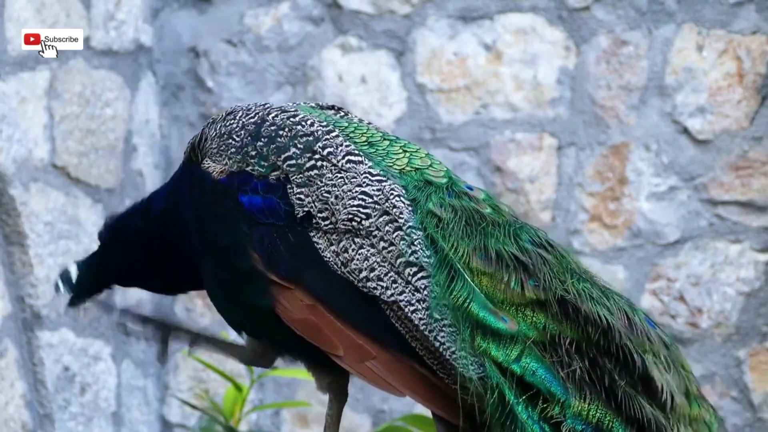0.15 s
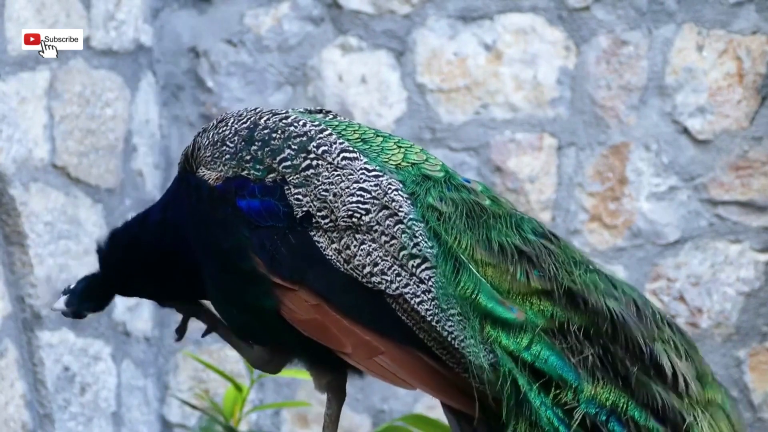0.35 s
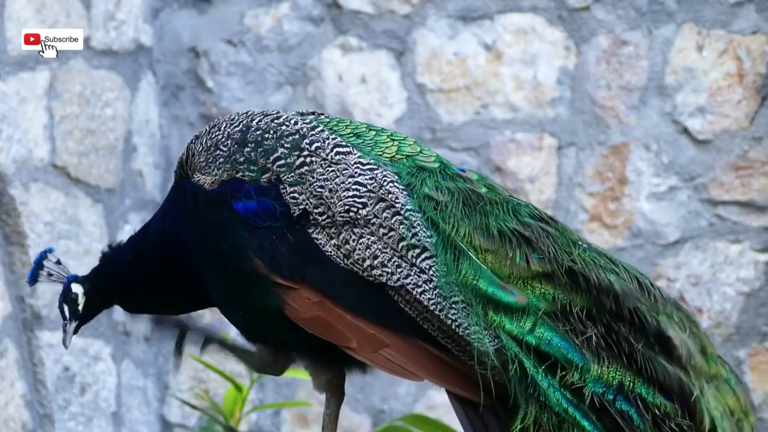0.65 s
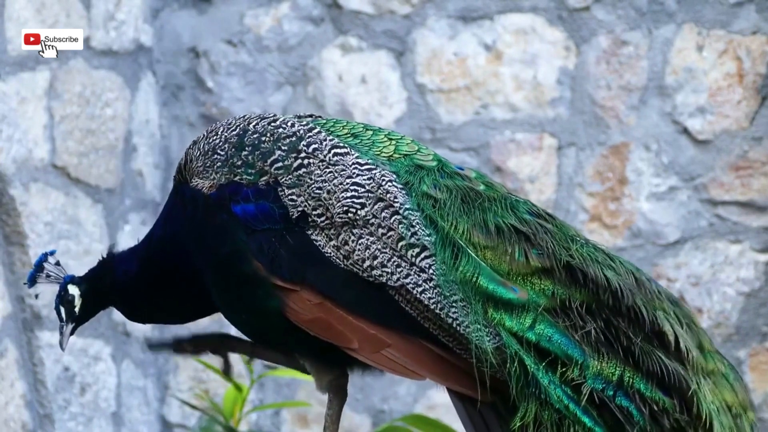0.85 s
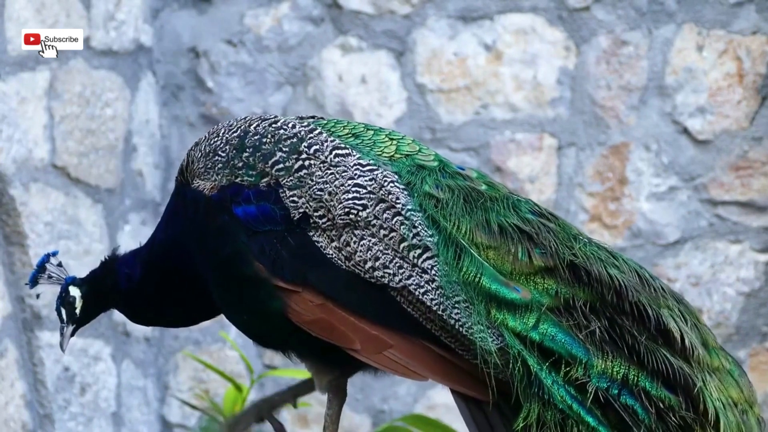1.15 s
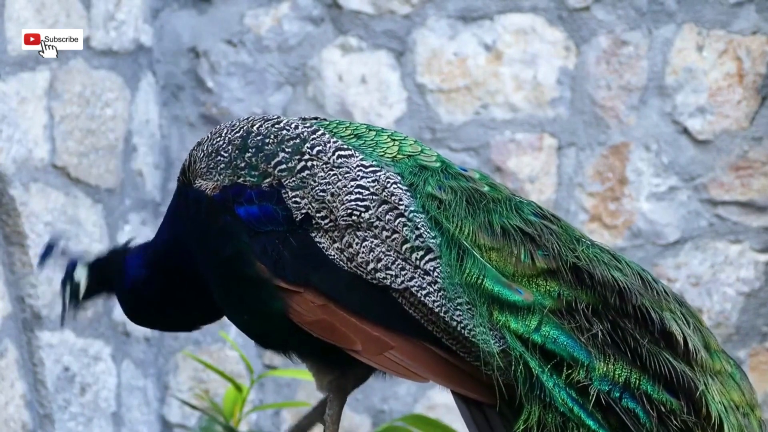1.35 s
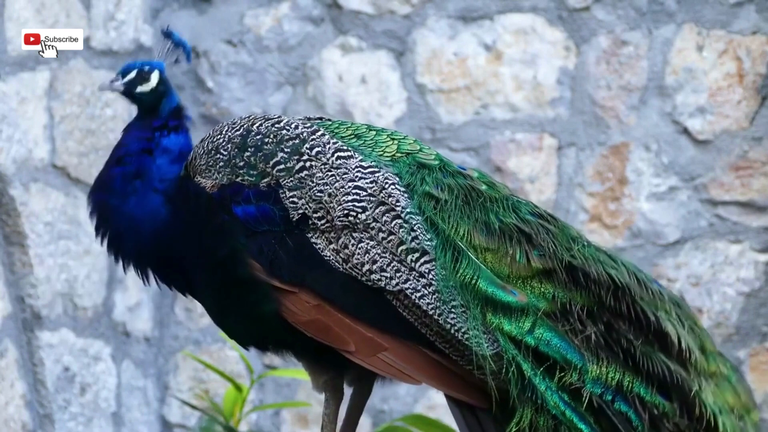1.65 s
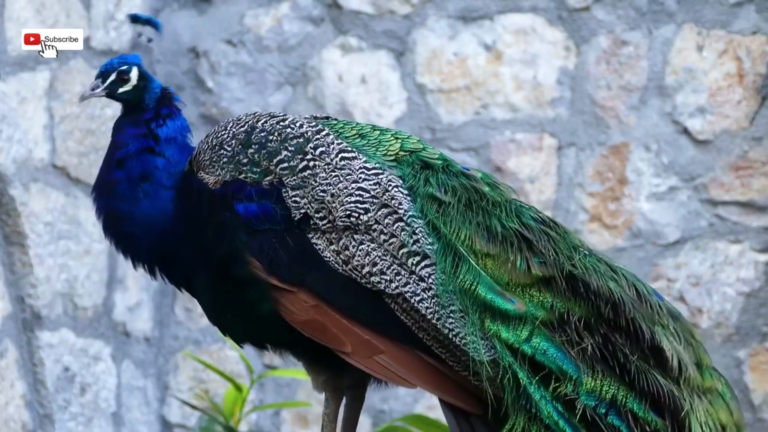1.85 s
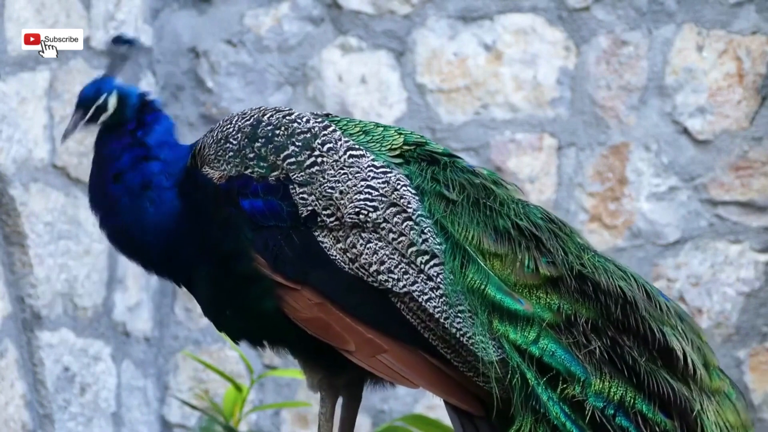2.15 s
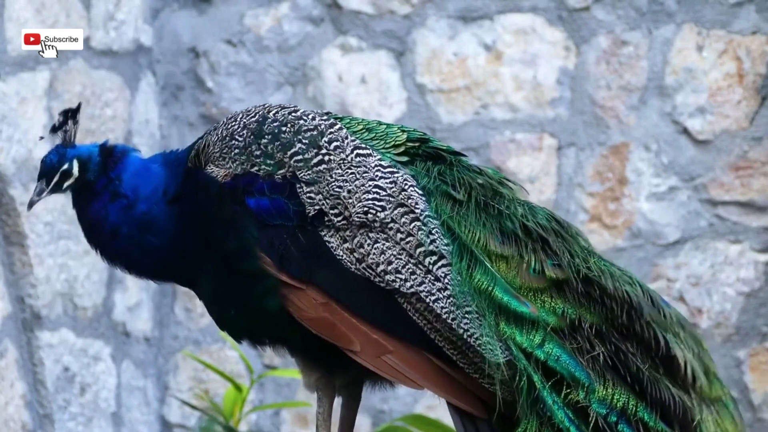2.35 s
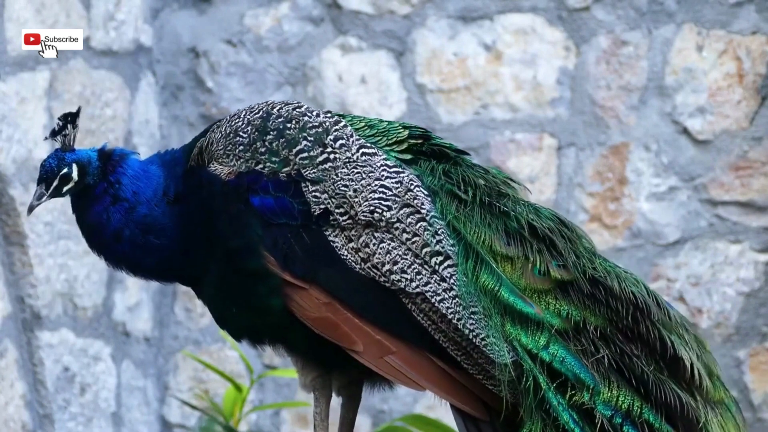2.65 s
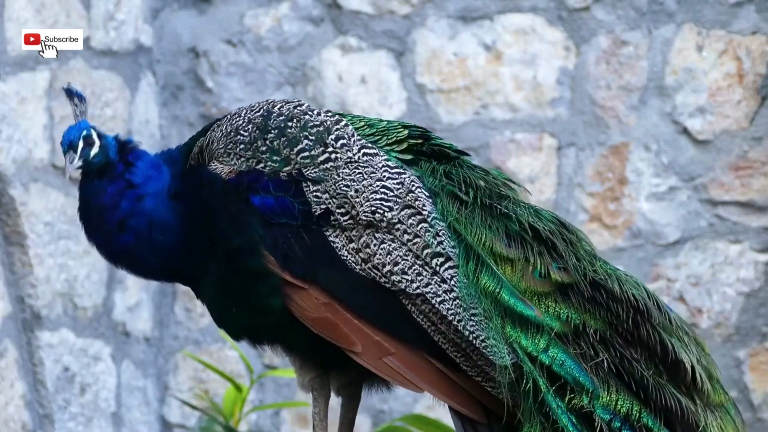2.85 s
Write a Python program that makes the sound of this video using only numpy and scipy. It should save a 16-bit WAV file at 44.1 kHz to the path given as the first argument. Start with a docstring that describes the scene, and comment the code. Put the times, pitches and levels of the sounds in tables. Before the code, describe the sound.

Two piercing nasal peacock wails, each arching up and down, over faint birds and outdoor rumble

```python
"""A peacock gives two loud, arching cries beside a stone wall, which throws them back.
Each cry is a stack of gliding harmonics coloured by throat resonances, with rasp and rushing air.
A brief shrill cluster of narrow noises opens the scene; small birds whistle far off as short swept sines.
Shaped noise makes the low outdoor rumble, the faint hiss and a wavering hum.
The recorder's gain control ducks the background under each cry."""
import sys
import numpy as np
from scipy import signal
from scipy.fft import rfft, irfft, next_fast_len
from scipy.io import wavfile
from scipy.ndimage import uniform_filter1d

SR = 44100
rng = np.random.default_rng(int(sys.argv[2]) if len(sys.argv) > 2 else 0)


def master(y):
    """Save y as 16-bit WAV."""
    cut = np.clip(np.atleast_2d(y).T, -1, 1)
    pcm = np.round(cut * 32767)  # scale
    wavfile.write(sys.argv[1], SR, pcm.astype(np.int16))


N = 132300
TIME = np.arange(N) / SR

# Background
AIR_DB, PATCH_DB, SWELL_DB = -30, 1.5, 0.5
HISS_HZ = 6530  # the hiss above here swells between the cries
HUM_HZ, HUM_WIDTH_HZ = 167.8, 4.1
SHRILL_END_S, SHRILL_FADE_DB_PER_S, SHRILL_DB = 0.049, 109, 0.5

# Peacock voice
VOICE_DB, ATTACK_S, RELEASE_S = 0.5, 0.013, 0.0056
JITTER, JITTER_HZ, SHIMMER_DB = 0.0012, 90, 1  # pitch wobble (fraction), its rate, level wobble
CLEAN_HZ, STRAIN_HZ = 802, 111  # the voice grows rougher as its pitch falls below CLEAN_HZ
RASP_DB, RASP_HZ = -41, 380
RASP_GROWTH = 0.64  # rasp grows with this power of the harmonic's number
SOFT_DB, DULLING, DULL_ABOVE_HZ = -3, 0.67, 5100  # below this effort the treble drops by DULLING dB per dB
RUSH_DB, RUSH_SPREAD_HZ = -35, 230  # the rush of air clings to each harmonic
GLIDE_HZ_PER_S, GLIDE_POWER = 650, 0.85  # the rush grows with the speed of the pitch slide

# Wall, yard and far birds
SCATTER_DB, SCATTER_S = -7, 0.052  # level ahead of the high-pass, length
SCATTER_ABOVE_HZ = 1670  # rough stone scatters the treble and little of the bass
YARD_DB, YARD_DELAY_S = -20, 0.0094  # send level, time for the tail to build up
BLUR_RAD, BLUR_HZ = 0.86, 66  # phase wander of the tail, its rate
CHIRP_WAVER, CHIRP_WET_DB = 0.012, 2.5  # pitch waver (fraction), send into the yard

# Recorder
THRESHOLD_DB, RATIO = -19, 2.25
RECOVER_DB_PER_S = 165  # fall of the held level that steers the gain
LOW_CUT_HZ, EDGE_HZ = 32, 15500


def amp(db):
    """Decibels to gain."""
    return 10 ** (np.asarray(db) / 20)


def unit(x):
    """Scales to rms 1."""
    return x / np.sqrt(np.mean(abs(x) ** 2) + 1e-20)


def read(points, hz):
    """Reads a curve of values over frequency on a log-frequency axis."""
    f, value = np.transpose(points)
    return np.interp(np.log(hz + 1), np.log(f + 1), value)


def add(mix, s, sound):
    """Adds a sound to the mix at time s in seconds."""
    part = mix[max(round(s * SR), 0):][:len(sound)]
    part += sound[:len(part)]


def wander(rate_hz):
    """Random motion of rms 1: noise that falls off steeply above the given rate."""
    hz = np.fft.rfftfreq(N, 1 / SR)
    return unit(irfft(rfft(rng.standard_normal(N)) / (1 + (hz / rate_hz) ** 4), N))


def flutter(rate_hz):
    """Random wobble of both size and phase."""
    return (wander(rate_hz) + 1j * wander(rate_hz)) / 2


def fuzzy_tone(hz, width_hz):
    """Noise in one narrow band around a pitch, at rms 1."""
    carrier = np.exp(2j * np.pi * hz * TIME)
    return unit((flutter(width_hz / 2) * carrier).real)


def air():
    """Outdoor rumble and hiss: noise shaped in frequency with drifting patches, and a wavering low hum."""
    # Spectrum of the air before scaling. Each row: frequency in Hz, relative density in dB per Hz.
    air_spectrum = [(20, -28.5), (32, -11), (48, -10), (85, -4), (125, -10.5), (166, -2.5), (230, -6.5),
                    (330, -9), (500, -14.5), (1100, -20), (1600, -23), (2400, -23.5), (3600, -27.5),
                    (5000, -36), (6300, -46.5), (8100, -56.5), (9500, -66), (15000, -74.5)]
    # Swell of the top of the hiss. Each row: time in seconds, level in dB.
    hiss_level = [(0, -6), (.6, -26), (.95, -11), (1.3, 4), (1.8, 7), (2.1, -2), (2.6, -9.5), (3, -8.5)]
    # Loudness of the hum. Each row: time in seconds, level in dB.
    hum_level = [(0, -43), (1.0, -40), (1.6, -39), (2.05, -34), (2.4, -38), (3, -40)]
    frames, hz = N // 512 + 5, np.fft.rfftfreq(2048, 1 / SR)
    t = np.arange(frames) * 512 / SR
    real, imag, patches = rng.standard_normal((frames, len(hz), 3)).T
    patches = uniform_filter1d(patches, size=16, axis=0)
    patches = unit(uniform_filter1d(patches, size=7, axis=1))
    z = (real + 1j * imag) * amp(read(air_spectrum, hz)[:, None] + PATCH_DB * patches)
    top = 1 - 1 / (1 + (hz[:, None] / HISS_HZ) ** 8)
    z *= amp(top * np.interp(t, *np.transpose(hiss_level)))
    wash = unit(signal.istft(z, nperseg=2048, noverlap=1536)[1][:N])
    swell = amp(AIR_DB + SWELL_DB * wander(rate_hz=2))
    hum = amp(np.interp(TIME, *np.transpose(hum_level))) * fuzzy_tone(HUM_HZ, HUM_WIDTH_HZ)
    return swell * wash + hum


def shrill():
    """A cluster of high partials and a band of noise holds briefly and fades."""
    # Partials and noise band. Each row: frequency in Hz, width in Hz, level in dB before the common trim.
    partials = [(2430, 30, -40), (2630, 120, -39.5), (2850, 150, -38), (3150, 780, -35.5), (3225, 47, -32),
                (3610, 36, -33.5)]
    level = SHRILL_DB - SHRILL_FADE_DB_PER_S * np.maximum(TIME - SHRILL_END_S, 0)
    return amp(level) * sum(amp(db) * fuzzy_tone(hz, width) for hz, width, db in partials)


def cry(table, throat):
    """Harmonics of the syrinx sweep through the throat's resonances, with rasp at low pitch and air on slides."""
    # Rush of air through the strained syrinx. Each row: frequency in Hz, relative density in dB per Hz.
    rush_spectrum = [(1000, -23), (2500, -7.5), (4000, 3.5), (6000, -0.5), (7300, -20), (8600, -23),
                     (10500, -16), (11700, -26.5), (13200, -29.5), (15000, -36.5)]
    s, pitch, effort, second, third = np.transpose(table)
    t = np.arange(s[0], s[-1] + RELEASE_S, 1 / SR)
    n = len(t)
    hz = uniform_filter1d(np.interp(t, s, pitch), size=500)
    effort_db = np.interp(t, s, effort)
    strain = 1 + np.clip((CLEAN_HZ - hz) / STRAIN_HZ, 0, 2)
    jittered_hz = hz * (1 + JITTER * strain * wander(JITTER_HZ)[:n])
    phase = 2 * np.pi * np.cumsum(jittered_hz) / SR
    lift = {2: np.interp(t, s, second), 3: np.interp(t, s, third)}
    dull_db = DULLING * np.minimum(effort_db - SOFT_DB, 0)
    slide_hz_per_s = abs(np.gradient(uniform_filter1d(hz, size=2600))) * SR
    glide = (slide_hz_per_s / GLIDE_HZ_PER_S) ** GLIDE_POWER
    voice = np.zeros(n)
    for k in range(1, 21):
        rasp = amp(RASP_DB) * strain * k ** RASP_GROWTH * flutter(RASP_HZ)[:n]
        tone = amp(read(throat, k * hz) + lift.get(k, 0)) * (1 + rasp)
        rush = amp(RUSH_DB + read(rush_spectrum, k * hz)) * glide * flutter(RUSH_SPREAD_HZ)[:n]
        dull = amp(dull_db / (1 + (DULL_ABOVE_HZ / (k * hz)) ** 10))
        carrier = np.exp(1j * (k * phase + 2 * np.pi * rng.random()))
        voice += dull * ((tone + rush) * carrier).real
    fade_in = np.clip((t - t[0]) / ATTACK_S, 0, 1)
    fade_out = np.clip((t[-1] - t) / RELEASE_S, 0, 1)
    level = VOICE_DB + effort_db + SHIMMER_DB * strain * wander(JITTER_HZ)[:n]
    return s[0], np.sqrt(2) * fade_in * fade_out * amp(level) * voice


def walls(x):
    """Direct sound, a few distinct echoes and the scatter of rough stone."""
    # Reflections from the ground and the walls. Each row: delay in seconds, level in dB.
    echoes = [(.007, -18.5), (.024, -24.5), (.038, -16.5), (.046, -18)]
    t = np.arange(SR // 8) / SR
    taps = rng.standard_normal(len(t)) * np.minimum(t / 0.0014, 1) / (1 + (t / SCATTER_S) ** 6)
    taps *= amp(SCATTER_DB) / np.linalg.norm(taps)
    taps = signal.sosfilt(signal.butter(2, SCATTER_ABOVE_HZ, "high", fs=SR, output="sos"), taps)
    taps[0] += 1  # direct sound
    for delay, db in echoes:
        add(taps, delay, amp([db]))
    return signal.fftconvolve(x, taps)[:N]


def yard(x):
    """The long diffuse tail of the yard: each band dies at its own speed, and held tones smear."""
    # Decay of the tail. Each row: frequency in Hz, time in seconds to fall by 60 dB.
    decay = [(500, 1.4), (2500, 1.32), (4500, 1.44), (7000, 0.28), (14000, 0.84)]
    hz, t, z = signal.stft(rng.standard_normal(SR * 3 // 2), SR, nperseg=256)
    tail = signal.istft(z * amp(-60 * t / read(decay, hz)[:, None]), SR, nperseg=256)[1]
    tail *= np.minimum(np.arange(len(tail)) / SR / YARD_DELAY_S, 1)
    wet = signal.fftconvolve(x, tail / np.linalg.norm(tail) / np.sqrt(2))
    analytic = signal.hilbert(wet, next_fast_len(len(wet)))[:N]
    return (analytic * np.exp(1j * BLUR_RAD * wander(BLUR_HZ))).real


def small_birds():
    """Short wavering whistles, each a sine sliding between two pitches, blurred by distance."""
    # Far small birds. Each row: start in seconds, length in seconds, start pitch in Hz, end pitch in Hz,
    # peak level of the direct whistle in dB.
    chirps = [(1.06, 0.021, 6000, 5800, -51), (1.079, 0.11, 3800, 3715, -40), (1.18, .05, 4400, 4193, -49),
              (1.371, 0.045, 4300, 3750, -39), (1.41, 0.042, 3520, 3535, -38),
              (1.475, 0.047, 3500, 3540, -37.5), (1.554, .05, 3400, 3290, -43),
              (1.601, 0.089, 3150, 3050, -44), (1.965, 0.03, 3600, 4200, -43),
              (2.015, 0.014, 2800, 2490, -33)]
    out = np.zeros(N)
    for start, length, from_hz, to_hz, db in chirps:
        n = int(length * SR)
        hz = np.linspace(from_hz, to_hz, n) * (1 + CHIRP_WAVER * wander(rate_hz=330)[:n])
        whistle = np.sin(2 * np.pi * np.cumsum(hz) / SR)
        add(out, start, amp(db) * np.sqrt(np.hanning(n)) * whistle)
    return out + amp(CHIRP_WET_DB) * yard(out)


def scene():
    """The peacock in its yard, with the background."""
    # Course of each cry. Each row: time in seconds, pitch in Hz, effort in dB, lift of the 2nd harmonic in dB,
    # lift of the 3rd harmonic in dB.
    first_cry = [(0.186, 635, -16.5, 4.5, 10), (0.21, 670, -19.5, 10.5, 7.5), (0.25, 706, -7, 2, 8),
                 (0.29, 740.0, -7, -2.5, -5.5), (0.33, 781.3, -6, -1, 8), (0.38, 812.3, 0.5, -16.5, 2.5),
                 (0.45, 819.9, 0, -12.5, -2), (0.52, 822.5, -1, -5.5, 7.5), (0.59, 815.6, -1.5, -8.5, -0.5),
                 (0.65, 787, -3.0, -8, 5.5), (0.71, 753.5, -4, 2.5, -0.5), (0.76, 722.7, -11.5, -1.5, 11.5),
                 (0.8, 678, -11.0, 3.5, 5), (0.822, 599.7, -19.5, -0.5, -7)]
    second_cry = [(2.058, 647, -17.5, -3, -5), (2.09, 672.4, -17.5, 3.5, -1.5),
                  (2.145, 676.0, -13, -1, -11), (2.165, 703, -11, 1, 11), (2.195, 788, -12, 11, -4),
                  (2.23, 858.7, -5.5, -3, -19.5), (2.29, 889.7, 3.5, 0.5, -21),
                  (2.35, 897.9, 4, -6.5, -20.5), (2.4, 897.4, 6, -9.0, -15), (2.44, 882, 1, -6, -0.5),
                  (2.51, 845, -0.5, -7.5, -1.5), (2.58, 794.7, -0.5, -3.5, -5.5),
                  (2.64, 741.6, -6.5, 2, 4.5), (2.695, 690.4, -9, -3.5, 1), (2.725, 649, -17, -6, -17)]
    # Colour of throat and beak in each cry. Each row: frequency in Hz, relative level in dB.
    first_throat = [(620, -22.5), (760, -17.5), (900, -11.5), (1400, -7.5), (2100, -10), (2500, 0),
                    (2850, -6.5), (3120, -8), (3310, -27), (3530, -0.5), (3850, -14.5), (4100, -7.5),
                    (4500, -17.5), (5350, -21), (6400, -27.5), (7200, -51.5), (8200, -48.5), (10600, -51),
                    (12000, -70.5), (15000, -62.5)]
    second_throat = [(620.0, -32), (760.0, -21), (900.0, -18), (1400.0, -8.5), (2100.0, -8.0),
                     (2500.0, 1.5), (2800.0, -8), (3250.0, -9.5), (3600.0, -24), (4100.0, -11.5),
                     (4500.0, -21.0), (5350.0, -18.0), (6400.0, -31), (7200.0, -56.5), (8200.0, -48),
                     (10600.0, -60), (12000.0, -83), (15000.0, -92)]
    peacock = np.zeros(N)
    add(peacock, *cry(first_cry, first_throat))
    add(peacock, *cry(second_cry, second_throat))
    background = air() + shrill() + small_birds()
    return (walls(peacock) + amp(YARD_DB) * yard(peacock) + background)[None]


def record(dry):
    """Gain control with a quick fall and a steady recovery, then the band limits."""
    power_db = 10 * np.log10(abs(uniform_filter1d(dry[0] ** 2, size=300)) + 1e-12)
    # a peak hold that sinks at a constant rate
    fall = TIME * RECOVER_DB_PER_S
    held_db = np.maximum.accumulate(power_db + fall) - fall
    over_db = np.maximum(held_db - THRESHOLD_DB, 0)
    ducked = dry * amp(-(1 - 1 / RATIO) * uniform_filter1d(over_db, size=200))
    ducked = signal.sosfilt(signal.butter(6, LOW_CUT_HZ, "high", fs=SR, output="sos"), ducked)
    low_pass = signal.firwin(511, EDGE_HZ, window=("kaiser", 9), fs=SR)
    return signal.oaconvolve(ducked, low_pass[None], "same")


dry = scene()
out = record(dry)
master(out)
```